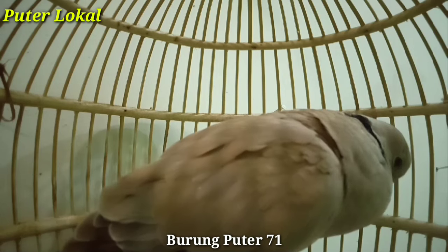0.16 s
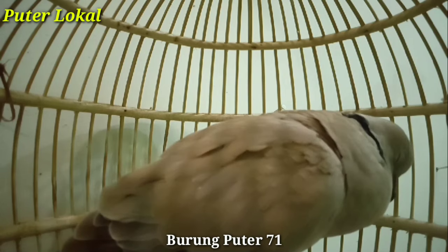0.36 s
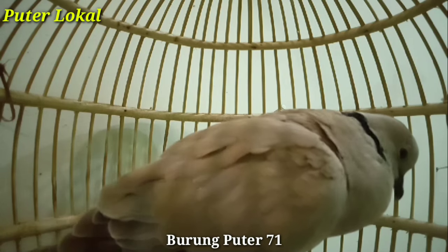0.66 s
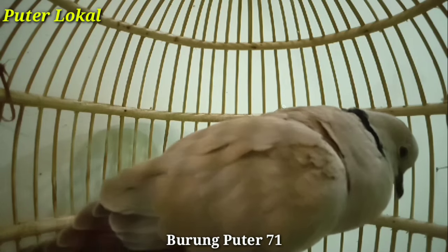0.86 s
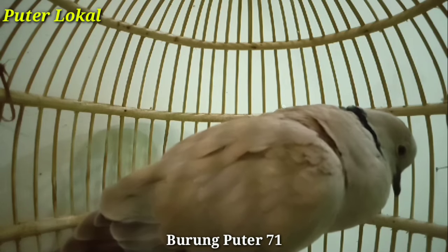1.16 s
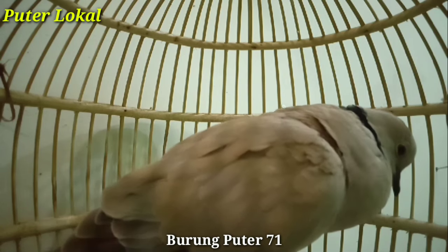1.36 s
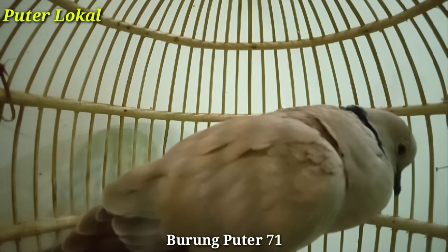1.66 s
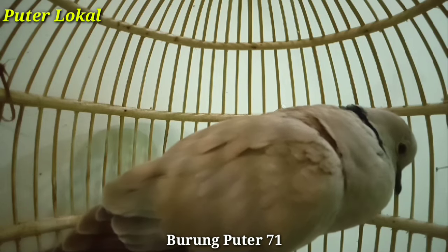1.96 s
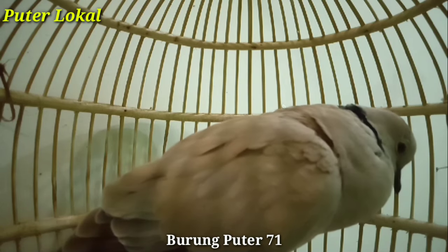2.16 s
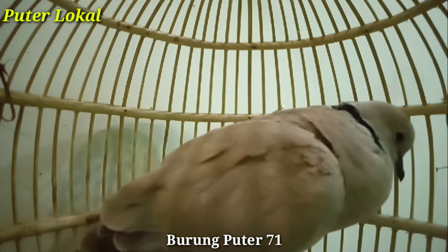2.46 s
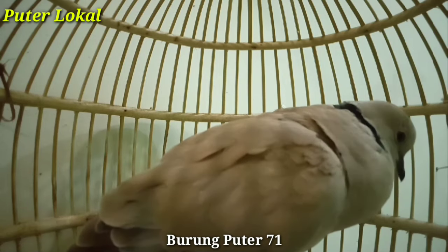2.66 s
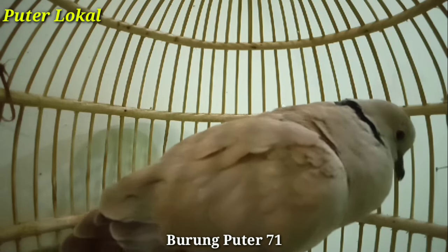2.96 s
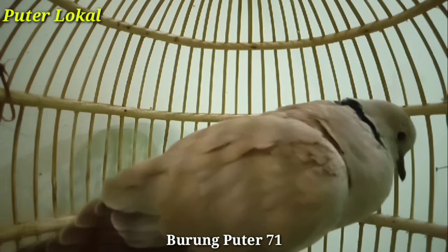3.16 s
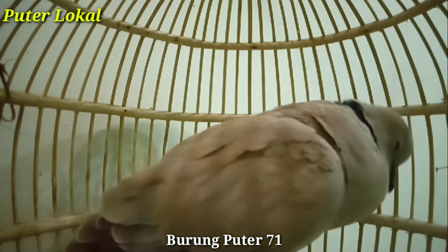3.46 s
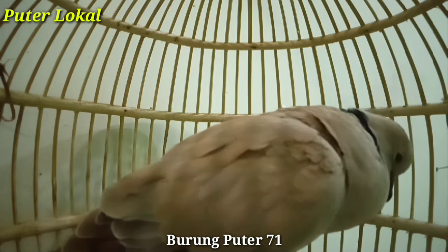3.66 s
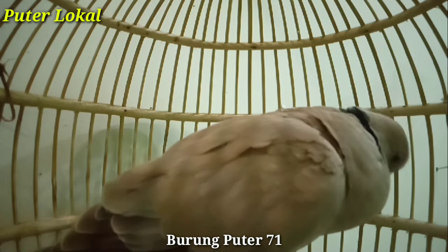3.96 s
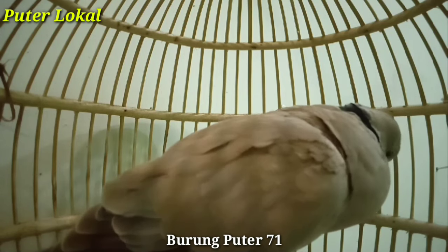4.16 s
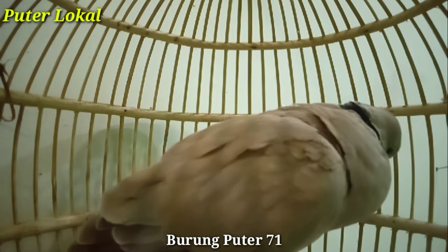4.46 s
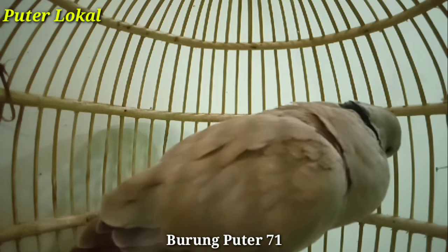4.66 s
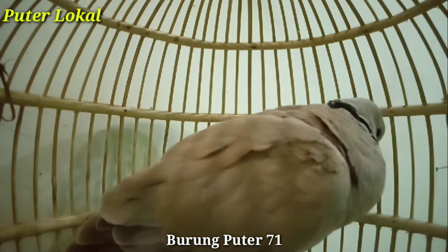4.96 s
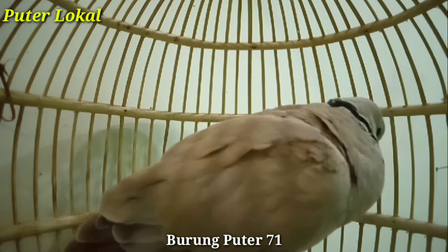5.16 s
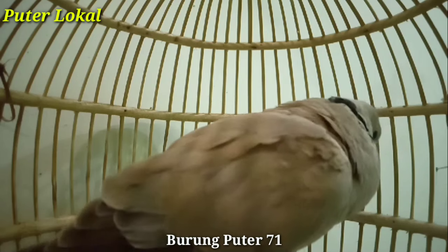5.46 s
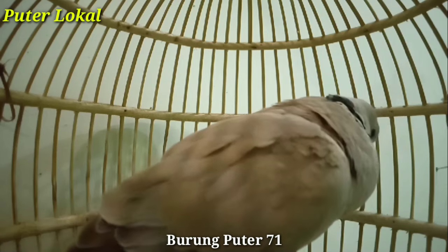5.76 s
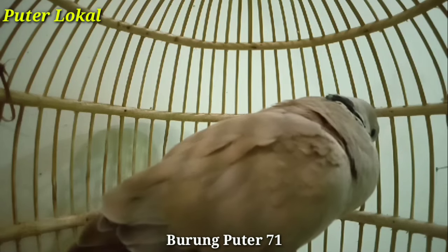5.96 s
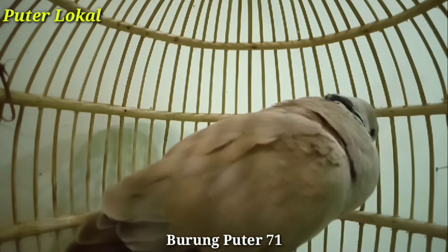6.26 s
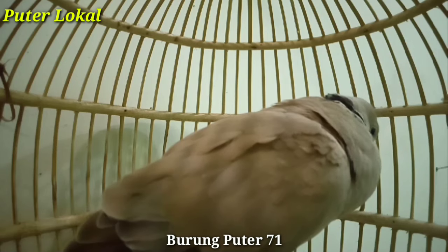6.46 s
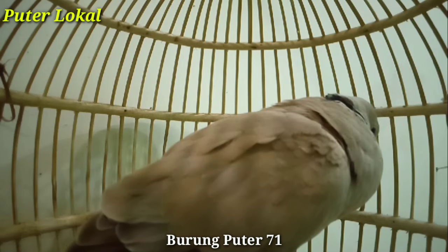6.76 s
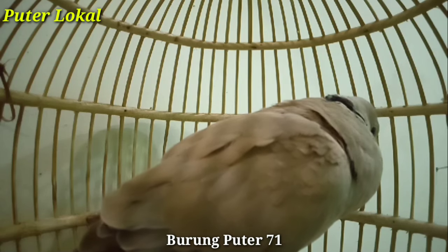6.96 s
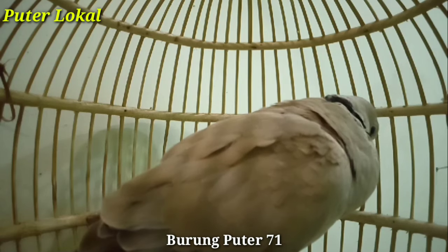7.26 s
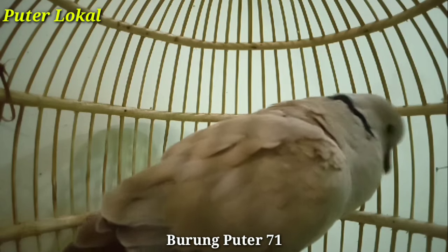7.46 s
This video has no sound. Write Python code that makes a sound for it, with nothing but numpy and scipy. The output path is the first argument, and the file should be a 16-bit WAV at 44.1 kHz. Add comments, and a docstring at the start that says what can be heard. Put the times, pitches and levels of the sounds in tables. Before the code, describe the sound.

A caged ringneck dove gives three rolling coo phrases in a small room, after an earlier coo's falling end, with faint clinks.

```python
"""Ringneck dove cooing

A ringneck dove coos three times in a cage in a small room, after the falling end of an earlier coo.
Each phrase is a short hoot, a rolled 'rrr', a long falling coo and a soft nasal after-note.
The voice is a sine passed by the inflated crop plus weak overtones; the after-note is a sum of harmonics.
Shaped bursts of noise make puffs, faint high clinks and dull far-off sounds; a low hum and hiss lie behind."""
import sys
import numpy as np
from scipy import signal
from scipy.fft import rfft, irfft, next_fast_len
from scipy.io import wavfile
from scipy.ndimage import uniform_filter1d

SR = 44100
rng = np.random.default_rng(int(sys.argv[2]) if len(sys.argv) > 2 else 0)


def wav_record(signal):
    """Record a signal, one row per channel, as 16-bit PCM in the file named by sys.argv[1]."""
    frames = np.transpose(np.atleast_2d(signal))
    bounded = np.clip(frames, -1, 1)
    # unit amplitude maps onto the largest positive 16-bit level
    quanta = np.round(bounded * 32767).astype(np.int16)
    wavfile.write(sys.argv[1], SR, quanta)


N = 334702
TIME = np.arange(N) / SR


def from_db(db):
    """Decibels to gain."""
    return 10 ** (np.asarray(db) / 20)


def rms_one(x):
    """Scale to unit power."""
    return x / np.sqrt(np.mean(x ** 2) + 1e-20)


def at_hz(points, hz):
    """Read a spectrum on a log-frequency axis."""
    freq, db = np.transpose(points)
    return np.interp(np.log(hz), np.log(freq), db)


def drift(rate):
    """Smooth chance of unit spread, changing about rate times a second."""
    step = 40   # samples between the slow points
    r = np.exp(-2 * step * np.pi * rate / SR)
    noise = rng.standard_normal(N // step + 2002)
    slow = signal.lfilter([1], [1, -2 * r, r * r], noise)[2000:]   # drop the filter's start-up
    return np.interp(np.arange(N) / step, np.arange(len(slow)), rms_one(slow))


def cycles(hz):
    """Add up a moving pitch into the phase of a wave, in radians."""
    return 2 * np.pi * np.cumsum(hz) / SR


def note(start, length, attack_s, release_s):
    """The samples that a note covers, its age at each, and its gain as it opens and shuts."""
    span = np.flatnonzero((TIME >= start) & (TIME < start + length))
    age = TIME[span] - start
    nearest_edge = np.minimum(age / attack_s, (length - age) / release_s)
    return span, age, np.sin(np.pi / 2 * np.clip(nearest_edge, 0, 1))


def in_turn(notes):
    """Lay notes end to end as tracks of pitch, gain and any extras; pitch is bridged across the gaps."""
    tracks = np.zeros((len(notes[0]) - 1, N))
    for span, *values in notes:
        for track, value in zip(tracks, values):
            track[span] = value
    sounding = tracks[0] > 0
    return np.interp(TIME, TIME[sounding], tracks[0][sounding]), *tracks[1:]


def dying_rings(events, attack_s):
    """Noise through two equal resonant filters: each burst swells within attack_s and dies away."""
    out, age = np.zeros(N + 2 * SR), TIME[:2 * SR]
    for s, db, hz, width, t60 in events:
        r = np.exp(-np.pi * width / SR)
        b, a = [1, 0.0095, -0.16], [1, -2 * r * np.cos(2 * np.pi * hz / SR), r * r]
        once = signal.lfilter(b, a, rng.standard_normal(len(age)))
        ring = rms_one(signal.lfilter(b, a, once))
        start = round(s * SR)
        fade = np.minimum(age / attack_s, 1) * from_db(db - 60 * age / t60)
        out[start:start + len(age)] += ring * fade
    return out[:N]


# Shape of the room noise. Each row: frequency in Hz, relative level in dB per Hz.
AIR = [(25, -32), (45, -19), (62, -10), (130, -6.5), (200, -11.5), (300, -14), (650, -18), (2000, -21.5),
       (3500, -23), (5000, -35), (7500, -31), (11000, -40), (15500, -35.5)]
# Low hum in the room. Each row: time in seconds, level in dB; levels glide from row to row.
HUM = [(0, -67.5), (1.4, -65.5), (1.9, -61.5), (2.4, -56.5), (2.7, -72.5), (7.59, -73)]
# Fainter steady lines above the hum. Each row: frequency in Hz, level in dB.
HUM_LINES = [(102.3, -74.5), (152, -73), (232, -73.5), (315, -78.5)]
AIR_DB, HUM_HZ = -59, 69.3


def background(sizzle_db=-77, sizzle_hz=7750, sizzle_width_hz=900, throb_hz=3.7, throb_db=-1.5, waver_hz=0.16):
    """Steady room noise, a low hum with fainter lines, and a thin, gently throbbing sizzle of noise."""
    freq = np.maximum(np.arange(N // 2 + 1) * SR / N, 1)
    air = rms_one(irfft(rfft(rng.standard_normal(N)) * from_db(at_hz(AIR, freq)), N))
    sizzle_peak = 1 / (1 + (2 * (freq - sizzle_hz) / sizzle_width_hz) ** 2)
    sizzle = rms_one(irfft(rfft(rng.standard_normal(N)) * sizzle_peak, N))
    sizzle *= from_db(sizzle_db + throb_db * np.cos(2 * np.pi * throb_hz * TIME))
    hum = np.sqrt(2) * np.sin(cycles(HUM_HZ + waver_hz * drift(3.4)))
    hum *= from_db(np.interp(TIME, *np.transpose(HUM)))
    lines = sum(np.sqrt(2) * from_db(db) * np.sin(2 * np.pi * hz * TIME) for hz, db in HUM_LINES)
    return from_db(AIR_DB) * air + sizzle + lines + hum


# Long falling coos; the first began before the sound starts.
# Each row: start in seconds, length in seconds, top pitch in Hz, level in dB.
COOS = [(-0.47, 0.57, 519.6, -12), (1.723, 0.57, 533.8, -11), (3.986, 0.485, 542.8, -10),
        (6.329, 0.56, 541.3, -11.5)]
COO_SCOOP_HZ, COO_SCOOP_DB, COO_SCOOP_S = 67, 7, 0.054   # a coo swells up into its top pitch
COO_SAG_HZ, COO_SAG_DB, COO_DULLING_DB = 85.6, 7.5, 2   # sinks and dulls ever faster as the air runs out
COO_COLLAPSE_HZ, COO_COLLAPSE_DB = 81.7, 18   # and collapses at the end
COO_COLLAPSE_AT = .781   # share of its length where the collapse begins


def long_coos(edge_s=0.036):
    """Pitch and level swell together, sink as the air runs out, and collapse at the end."""
    for start, length, top_hz, top_db in COOS:
        span, age, gate = note(start, length, edge_s, edge_s)
        scoop = np.maximum(1 - age / COO_SCOOP_S, 0)
        spent = (age / length) ** 2
        collapse = np.maximum((age / length - COO_COLLAPSE_AT) / (1 - COO_COLLAPSE_AT), 0)
        hz = top_hz - COO_SCOOP_HZ * scoop - COO_SAG_HZ * spent - COO_COLLAPSE_HZ * collapse ** 2
        db = top_db - COO_SCOOP_DB * scoop - COO_SAG_DB * spent - COO_COLLAPSE_DB * collapse
        yield span, hz, from_db(db) * gate, -COO_DULLING_DB * spent, 0


# Nasal after-notes.
# Each row: start in seconds, length in seconds, first pitch in Hz, sag in Hz per second, first level in dB.
AFTER_NOTES = [(0.154, 0.35, 165.6, 177, -41), (2.377, 0.2, 163.3, 106.4, -39.5),
               (4.555, 0.1, 153.4, 198.4, -47), (6.942, 0.21, 166.8, 180.2, -43.5)]
# Colour of the after-note through the closed beak. Each row: frequency in Hz, relative level in dB.
BEAK = [(150, -15.5), (310, -9.5), (450, -4), (600, 2), (740, -15.5), (900, -22), (1400, -32.5),
        (2000, -55.5)]
AFTER_LOWEST_HZ, AFTER_FADE_DB, AFTER_EDGE_S = 141.2, 13.5, .03


def after_notes(jitter=0.017):
    """A low buzz, muffled by the closed beak, that follows each long coo, sagging and fading."""
    notes = []
    for start, length, start_hz, sag_hz_per_s, db in AFTER_NOTES:
        span, age, gate = note(start, length, AFTER_EDGE_S, AFTER_EDGE_S)
        hz = np.maximum(start_hz - sag_hz_per_s * age, AFTER_LOWEST_HZ)
        notes.append((span, hz, from_db(db - AFTER_FADE_DB * age / length) * gate))
    hz, loud = in_turn(notes)
    phase = cycles(hz * (1 + jitter * drift(40)))
    buzz = sum(from_db(at_hz(BEAK, k * hz)) * np.cos(k * phase) for k in range(1, 13))
    return loud * rms_one(buzz)


# Faint high clinks. Each row: start in seconds, level in dB, centre in Hz, width of each filter in Hz,
# time to fade by 60 dB in seconds.
CLINKS = [(0.255, -61.5, 14440, 3500, 0.63), (0.255, -66.5, 8240, 3500, 0.47),
          (0.801, -66, 7880, 1300, 1.0), (1.286, -66, 7530, 591.5, 1.0), (1.434, -65.5, 8344, 1400, 0.9),
          (1.555, -61.5, 14650, 2550, 0.66), (2.591, -55.5, 7100, 1653, 0.22),
          (3.983, -62.5, 8870, 2200, 1.2), (5.347, -61.5, 7460, 977, 1.32), (5.522, -61, 7160, 1400, 0.84),
          (7.476, -54, 7800, 1600, 0.79)]


def clinks():
    """Narrow bands of high noise that start quickly and fade steadily in dB."""
    return dying_rings(CLINKS, attack_s=.01)


# Soft, dull sounds farther off. Each row: start in seconds, level in dB, centre in Hz,
# width of each filter in Hz, time to fade by 60 dB in seconds.
MUFFLED = [(0.485, -57, 909, 218, 1), (4.44, -51.5, 998, 161.3, 0.76), (5.04, -59.5, 1270, 200, 0.89),
           (7.19, -63, 621, 173.6, 2.6)]


def muffled_sounds():
    """Narrow bands of lower noise with a softer start, fading steadily in dB."""
    return dying_rings(MUFFLED, attack_s=0.019)


# Opening hoots. Each row: start in seconds, length in seconds, held pitch in Hz, overshoot in Hz,
# level in dB, overtone boost in dB.
HOOTS = [(0.843, 0.21, 529, 55.4, -15, 1), (3.151, 0.22, 527, 22, -15, 0.5),
         (5.475, 0.219, 530.8, 14, -15.5, 1.5)]
HOOT_ATTACK_S, HOOT_RELEASE_S = 0.019, .014
SCOOP_HZ, SCOOP_S = 124, 0.013   # a hoot slides up from this far below its pitch
OVERSHOOT_AT_S, OVERSHOOT_WIDTH_S = .078, 0.038   # then swings past it and settles
HOOT_LIFT_SHARE, HOOT_LIFT_S = .55, 0.032   # as it ends, it lifts again by this share of the overshoot


def hoots():
    """Each hoot scoops up, overshoots, holds and is cut short: samples, Hz, gain, overtone dB, roll 0 or 1."""
    for start, length, held_hz, overshoot_hz, db, boost_db in HOOTS:
        span, age, gate = note(start, length, HOOT_ATTACK_S, HOOT_RELEASE_S)
        scoop = np.exp(-age / SCOOP_S)
        swing = np.exp(-((age - OVERSHOOT_AT_S) / OVERSHOOT_WIDTH_S) ** 2)
        lift = HOOT_LIFT_SHARE * np.exp((age - length) / HOOT_LIFT_S)
        hz = held_hz - SCOOP_HZ * scoop + overshoot_hz * (swing + lift)
        swell = np.minimum(.5 + .5 * age / HOOT_ATTACK_S, 1)
        yield span, hz, from_db(db) * gate * swell, boost_db, 0


def hoot_puffs(puff_db=-52, puff_hz=650, puff_width_hz=900, puff_t60=0.74):
    """A small puff of filtered noise as each hoot starts."""
    puffs = [(hoot[0], puff_db, puff_hz, puff_width_hz, puff_t60) for hoot in HOOTS]
    return dying_rings(puffs, attack_s=0.0018)


# Beats of the rolls between hoot and coo.
# Each row: start in seconds, opening level in dB, closing level in dB.
BEATS = [(1.202, -34.5, -53.5), (1.243, -24.5, -20.5), (1.291, -16.5, -24.5), (1.344, -9, -28),
         (1.395, -11.5, -21), (1.455, -8.5, -22), (1.514, -8.5, -19.5), (1.582, -13.5, -9.5),
         (1.679, -22.5, -21), (3.486, -33, -45.5), (3.531, -25, -21.5), (3.578, -18, -24.5),
         (3.626, -14.5, -25), (3.676, -12, -21.5), (3.728, -10.5, -21), (3.789, -7.5, -20),
         (3.855, -11, -13.5), (3.937, -8, -16.5), (5.789, -30.5, -35), (5.854, -29, -24),
         (5.908, -21, -25.5), (5.958, -18, -22), (6.012, -13, -24.5), (6.071, -14.5, -17.5),
         (6.128, -12.5, -17.5), (6.194, -13.5, -11.5), (6.29, -17, -23)]
ROLL_TOP_HZ, ROLL_TOP_RISE_HZ = 497.4, 62.2   # pitch at the edges of a beat, and its rise over the roll
ROLL_SAG_HZ, ROLL_SAG_RISE_HZ = 438, 41.56   # lowest pitch in a beat, and its rise over the roll
BEAT_LOWEST_AT = .41   # the pitch is lowest at this share of a beat
# the slack middle of a beat: place and width as shares of its length
BEAT_SAG_AT, BEAT_SAG_DB, BEAT_SAG_WIDTH = 0.49, 8, 0.25
BEAT_OPEN_S, BEAT_SHUT_S = .012, .013
ROLL_OVERTONE_DB, ROLL_BRIGHTENING_DB = -7.5, 4.5   # a roll starts dull and brightens with effort


def rolls():
    """Each beat opens high, sags and climbs until the syrinx (voice organ) snaps shut; effort lifts pitch."""
    for hoot, long_coo in zip(HOOTS, COOS[1:]):
        beats = [beat for beat in BEATS if hoot[0] < beat[0] < long_coo[0]]
        stops = [beat[0] for beat in beats[1:]] + [long_coo[0]]
        for (start, open_db, close_db), stop in zip(beats, stops):
            span, age, gate = note(start, stop - start, BEAT_OPEN_S, BEAT_SHUT_S)
            along = age / (stop - start)
            effort = (TIME[span] - beats[0][0]) / (long_coo[0] - beats[0][0])
            top_hz = ROLL_TOP_HZ + ROLL_TOP_RISE_HZ * effort
            sag_hz = ROLL_SAG_HZ + ROLL_SAG_RISE_HZ * effort
            # the last beat stays low and runs on into the coo
            climbs = stop < long_coo[0]
            pull = np.interp(along, [0, BEAT_LOWEST_AT, 1], [1, 0, climbs])
            tension = np.sin(np.pi / 2 * pull) ** 2
            hz = sag_hz + (top_hz - sag_hz) * tension
            slack = np.exp(-((along - BEAT_SAG_AT) / BEAT_SAG_WIDTH) ** 2)
            db = open_db + (close_db - open_db) * along - BEAT_SAG_DB * slack
            yield span, hz, from_db(db) * gate, ROLL_OVERTONE_DB + ROLL_BRIGHTENING_DB * effort, 1


# Overtones of the voice as they leave the neck. Each row: frequency in Hz, relative level in dB.
THROAT = [(850, -51), (1050, -51.5), (1150, -59.5), (1300, -50), (1480, -54), (1570, -53.5), (1625, -45),
          (1740, -49.5), (1820, -51.5), (1980, -55.5), (2170, -62.5), (2600, -79.5), (3700, -88.5),
          (3800, -77), (4100, -88.5)]
CROP_LOW_HZ, CROP_HIGH_HZ = 400, 745   # the band that the inflated crop passes
JITTER, ROLL_JITTER = .0042, .006   # pitch flutter as a share of the pitch


def dove_voice(rasp=0.11, roll_rasp=0.68, overtone_growth=0.53, full_db=-13, even_db=-4, roll_even_db=-2.0):
    """The pure tone that the crop favours, and weak overtones: brighter in the hoot, dull, hoarse in the roll."""
    hz, loud, overtone_db, rolling = in_turn([*hoots(), *rolls(), *long_coos()])
    hz = uniform_filter1d(hz, size=300)   # smooth the joins
    phase = cycles(hz * (1 + np.where(rolling, ROLL_JITTER, JITTER) * drift(72)))
    even = from_db(np.where(rolling, roll_even_db, even_db))   # even harmonics are weaker
    overtones = 0
    for k in range(2, 8):
        strength = from_db(at_hz(THROAT, k * hz)) * (1 if k % 2 else even)
        overtones = overtones + strength * np.sin(k * phase)
    hoarse = 1 + (rasp + roll_rasp * rolling) * drift(110)
    # the overtones swell less, and more slowly, than the fundamental does
    swell = (loud / from_db(full_db)) ** overtone_growth
    drive = uniform_filter1d(swell * from_db(overtone_db), size=600)
    crop = signal.butter(2, [CROP_LOW_HZ, CROP_HIGH_HZ], "band", fs=SR, output="sos")
    tone = signal.sosfilt(crop, loud * np.sin(phase) + 1e-18)
    return np.sqrt(2) * tone, np.sqrt(2) * drive * hoarse * overtones


# Echoes off nearby walls. Each row: delay in seconds, echo level in dB.
WALLS = [(0.005, -20.5), (0.0146, -18.5), (0.0354, -15.5), (0.0678, -19)]
ROOM_T60_S = 0.592   # time for the tail to fade by 60 dB


def room(tone, overtones, tone_tail_db=-11.5, overtone_tail_db=-11.0):
    """Wall echoes, then a tail of twelve to-and-fro paths; the dove faces away, so overtones are wetter."""
    size = next_fast_len(N + SR)
    # phase turn per second of delay; only the lowest quarter of the spectrum is kept
    turn = -2j * np.pi * np.arange(size // 8) / size * SR
    early = sum(from_db(db) * np.exp(turn * s) for s, db in WALLS)
    tail = 0
    for k, s in enumerate(np.geomspace(.0236, .0562, 12)):   # time of one bounce in seconds
        bounce = from_db(-60 * s / ROOM_T60_S) * np.exp(turn * s)
        tail = tail + (-1) ** k * bounce / (1 - bounce)   # all repeats of the bounce, summed
    tail = tail / np.std(tail)
    heard = 0
    for x, tail_db in [(tone, tone_tail_db), (overtones, overtone_tail_db)]:
        heard = heard + rfft(x, size)[:len(turn)] * (1 + early + from_db(tail_db) * tail)
    return irfft(heard, size)[:N]


def scene():
    """The dove in its room, with faint clinks, dull far-off sounds and the background."""
    tone, overtones = dove_voice()
    dove = room(tone + hoot_puffs() + after_notes(), overtones)
    return (dove + clinks() + muffled_sounds() + background())[None]


CUTOFF_HZ = 15600


def record(dry, threshold_db=-51, depth_db=5, knee_db=6, hiss_hz=1200):
    """A mild gate turns everything above hiss_hz down in quiet moments; a steep filter cuts the top."""
    level_db = 10 * np.log10(uniform_filter1d(dry ** 2, size=3000) + 1e-12)
    shut = np.clip((threshold_db - level_db) / knee_db + .5, 0, 1)   # 0 open, 1 shut
    shut = uniform_filter1d(shut, size=3000)
    hiss = signal.sosfiltfilt(signal.butter(2, hiss_hz, "high", fs=SR, output="sos"), dry)
    gated = dry - hiss * (1 - from_db(-depth_db * shut))
    return signal.sosfilt(signal.ellip(10, .1, 80, CUTOFF_HZ, fs=SR, output="sos"), gated)


dry = scene()
out = record(dry)
wav_record(out)
```